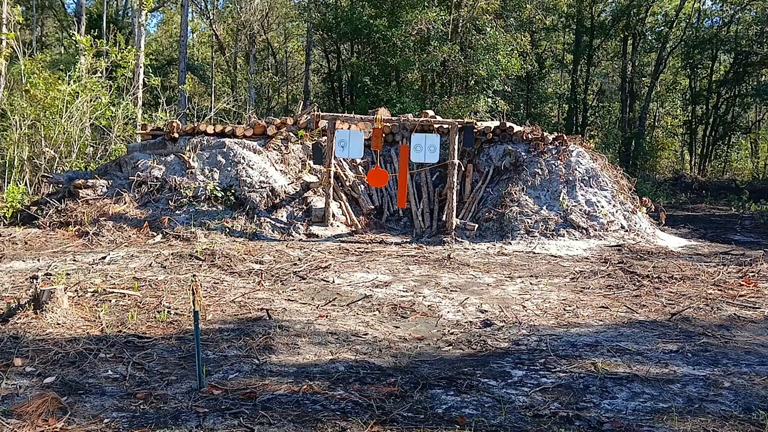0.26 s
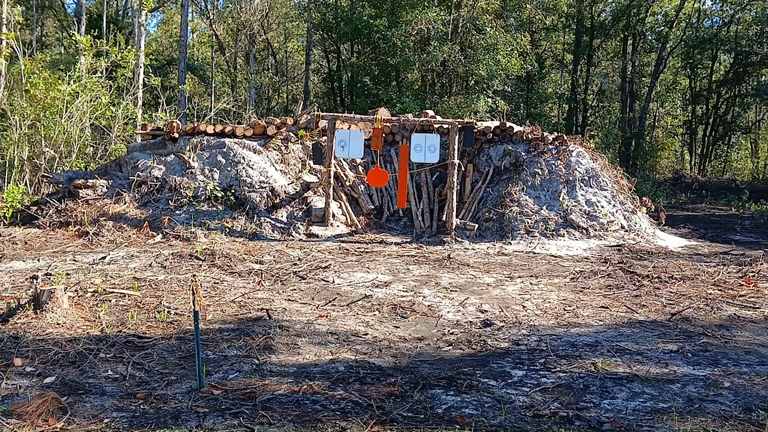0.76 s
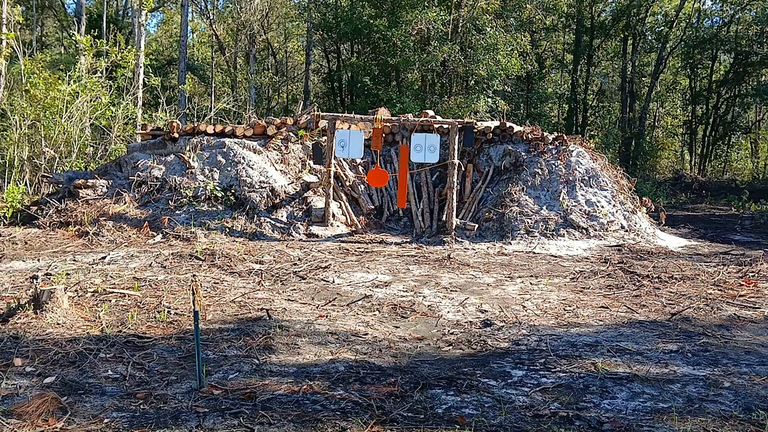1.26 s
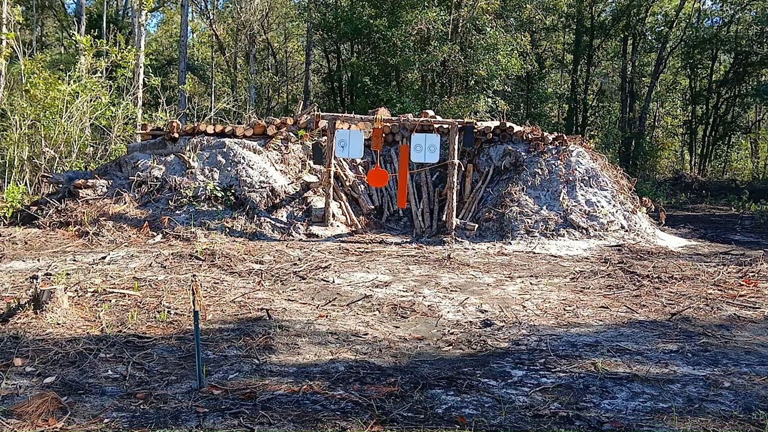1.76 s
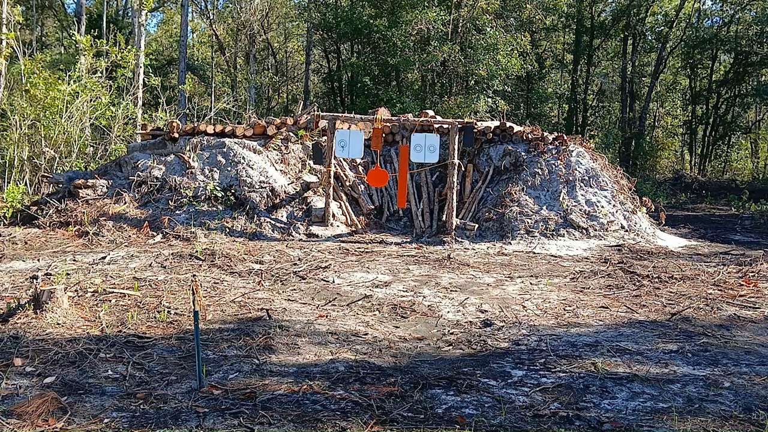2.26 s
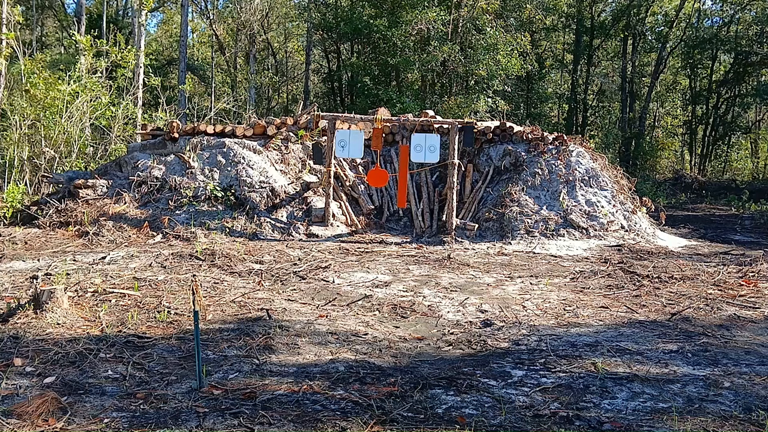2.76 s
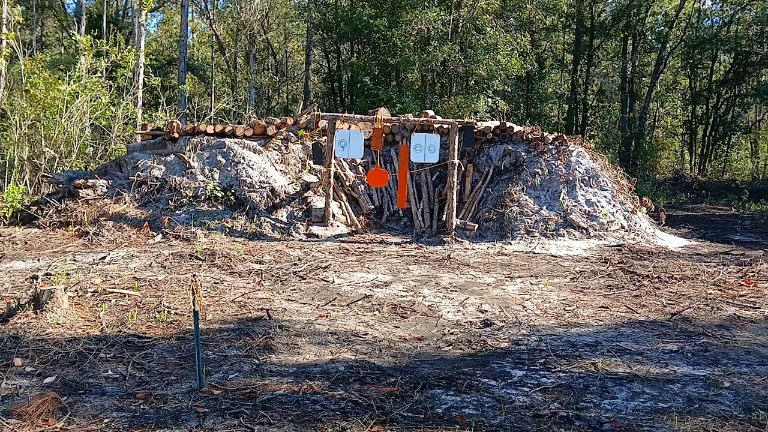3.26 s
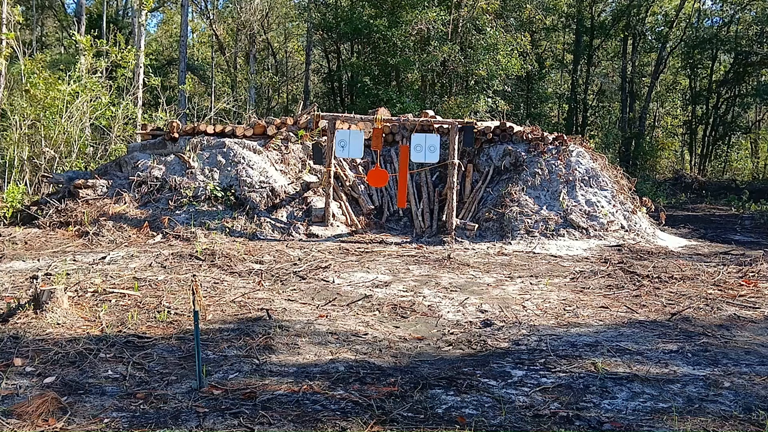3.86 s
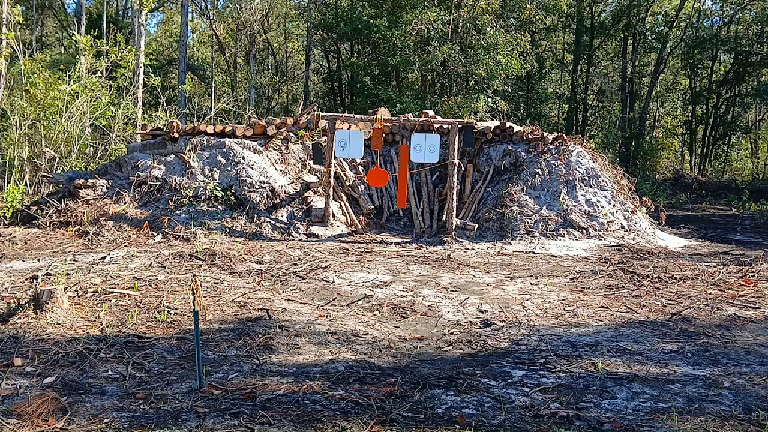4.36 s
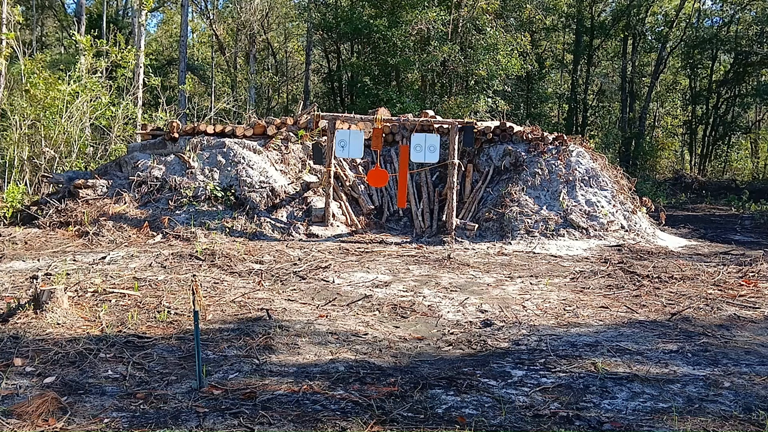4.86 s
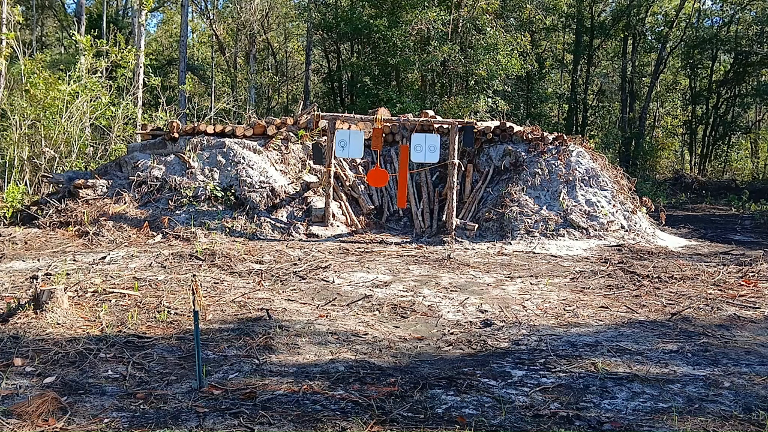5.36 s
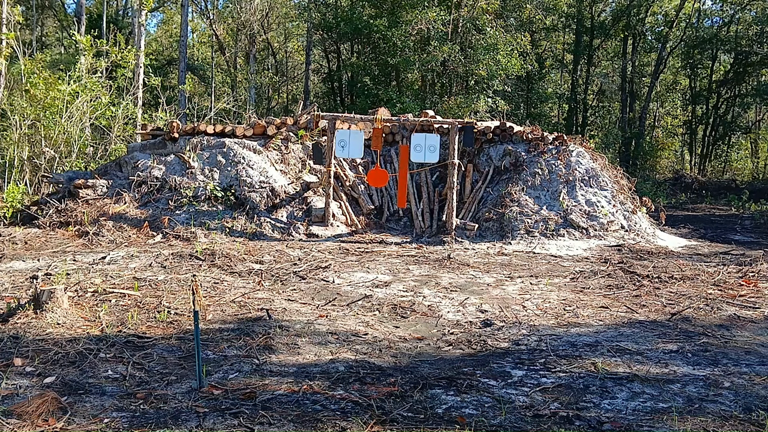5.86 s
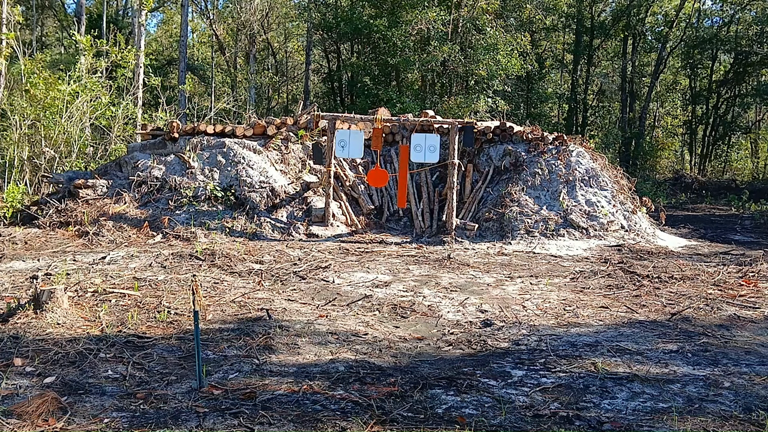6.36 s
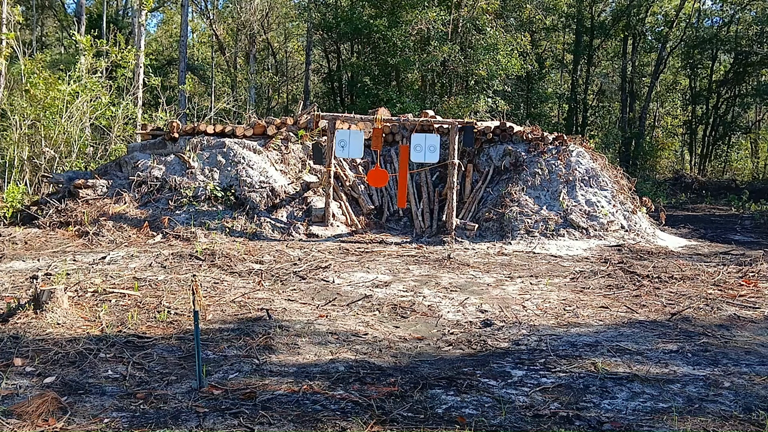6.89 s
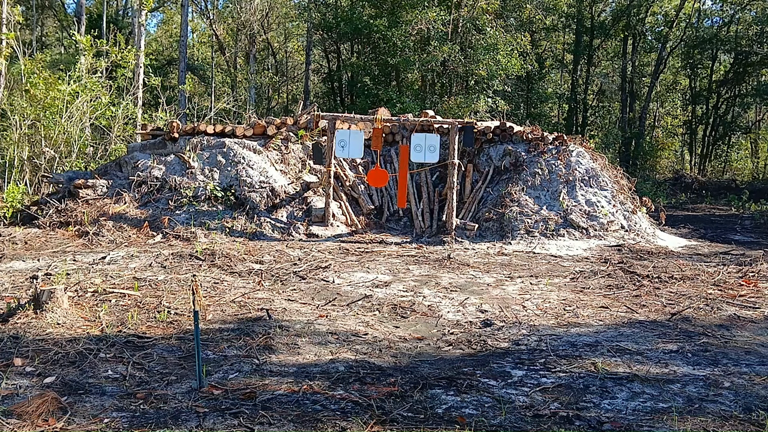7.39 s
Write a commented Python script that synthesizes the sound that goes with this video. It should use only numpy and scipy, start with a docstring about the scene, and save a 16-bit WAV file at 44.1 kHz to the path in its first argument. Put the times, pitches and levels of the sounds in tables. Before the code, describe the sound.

A calm forest clearing, heard in stereo from beside the shooter: soft hush, a low distant engine drone, a thin far cricket and intermittent very high, fast trills. Tiny bird chips at 0.3 and 0.5 s lead to a phrase at 0.6-1.5 s, a short buzz then gliding whistles, slightly right. At 1.66 s an air rifle fires: a faint hammer tick, a dry, sharp blast and a low shudder. At 1.76 s the pellet cracks hard on a hanging steel plate; bright clang fades over about a second, lower modes linger, and the trees return a faint echo near 2.0 s. The background is ducked, then creeps back. The cricket swells around 3.2 s. Light metallic clicks with rattle come at 3.35, 3.9-4.15 and 4.45-4.6 s. A thin, high steady whine grows from 3.7 s. The bird chips at 4.64 s and repeats its phrase from 5.0 s as the engine peaks around 5.5 s.

```python
"""In a forest clearing a soft hush, an engine's drone and a far cricket's tone last throughout, and a high
trill comes and goes. A songbird chips and sings its phrase, a harmonic buzz and gliding whistles. An air rifle
fires as bursts of coloured noise; a tenth of a second later the pellet cracks on a hanging steel plate, whose
decaying modes ring on while the trees scatter the clang. Later the rifle's action clicks, a thin whine of
steady tones grows, and the bird sings again as the engine passes nearest."""
import sys
import numpy as np
from scipy import signal
from scipy.fft import rfft, irfft
from scipy.io import wavfile
from scipy.ndimage import uniform_filter1d, minimum_filter1d

SR = 44100
rng = np.random.default_rng(int(sys.argv[2]) if len(sys.argv) > 2 else 0)


def file_out(sig):
    """Save sig as 16-bit WAV at sys.argv[1]."""
    # one column per channel
    cols = np.atleast_2d(sig).T
    # limit, then scale
    lim = np.clip(cols, -1, 1)
    pcm = np.round(lim * 32767).astype(np.int16)
    wavfile.write(sys.argv[1], SR, pcm)


N = 336465
TIME = np.arange(N) / SR


def amp(db):
    """The decibel: twenty of them make a tenfold gain."""
    return 10 ** (np.asarray(db) / 20)


def unit(x):
    """Normalization to a root-mean-square of 1."""
    return x / np.sqrt(np.mean(x ** 2) + 1e-20)


def read(points, hz):
    """Interpolation of a frequency table along a logarithmic axis."""
    f, value = np.transpose(points)
    return np.interp(np.log(hz + 1), np.log(f + 1), value)


def add(mix, s, sound):
    """Superposition: a stereo sound joins the mix at time s."""
    part = mix[:, max(round(s * SR), 0):][:, :sound.shape[1]]
    part += sound[:, :part.shape[1]]


def place(x, lag, right_db=0):
    """Interaural cues: the left channel is late by lag samples, the right differs by right_db."""
    return np.array([np.roll(x, round(lag)), x * amp(right_db)])


def noise(spectrum, size, same=0., tilt_db=0):
    """Filtered noise: stereo, rms 1, with a given colour, tilt per octave and left-right correlation."""
    hz = np.fft.rfftfreq(size, 1 / SR)
    a, b = rfft(rng.standard_normal((2, size)))
    c = np.clip(read(same, hz) if np.ndim(same) else same, -1, 1)
    colour = amp(read(spectrum, hz) + tilt_db * np.log2((hz + 200) / 4000))
    right = c * a + np.sqrt(1 - c ** 2) * b
    return unit(irfft(np.array([a, right]) * colour, size))


def burst(spectrum, db, t60, same=0., tilt_db=0, rise=0.0003):
    """Exponential decay: coloured noise rises quickly and loses 60 dB in t60 seconds."""
    t = TIME[:SR]
    envelope = amp(db - 60 * t / t60) * (1 - np.exp(-t / rise))
    return noise(spectrum, SR, same, tilt_db) * envelope


def wander(size, rate):
    """Band-limited random modulation of rms 1, drawn at rate knots a second."""
    knots = rng.standard_normal(int(size / SR * rate) + 8)
    smooth = signal.resample(knots, 8 * len(knots))
    return unit(np.interp(np.linspace(0, len(smooth) - 1, size), np.arange(len(smooth)), smooth))


def trees(x, wet_db, t60):
    """Multiple scattering: trunks and leaves return sparse random echoes as a decaying tail."""
    t = TIME[:SR]
    echoes = rng.standard_normal((2, SR)) * (rng.random((2, SR)) < .08)
    tail = echoes * amp(-60 * t / t60) * (1 - np.exp(-t / 0.0034))
    return x + amp(wet_db) * signal.fftconvolve(x, tail / np.linalg.norm(tail[0]), axes=1)[:, :N]


# The shot: hammer, then the blast of air. Each row: start in seconds, level in dB, decay t60 in seconds.
SHOT_BURSTS = [(1.6554, -27, .05), (1.6622, -6, .014), (1.6654, -3.5, .006), (1.666, -18, .05)]
# Colours of the blast, the clearing's answer and the puff of air.
# Each row: frequency in Hz, relative spectral density in dB.
BLAST_COLOUR = [(30, -8), (200, -6.5), (500, -3.5), (1000, 1.5), (3200, 0.5), (5800, -9), (7500, -2.5),
                (10500, 2), (13500, -3), (16000, -6)]
CLEARING_COLOUR = [(30, -1.5), (150, -4.5), (700, -6), (2000, -1), (6000, -9), (9500, 1), (12500, 1),
                   (16000, -3.5)]
PUFF_COLOUR = [(15, -10), (40, -1.5), (130, -5), (400, -5.5), (900, -21.5), (3000, -50.5)]


def rifle():
    """Impulsive radiation: the hammer trips the valve, air leaves the muzzle, the clearing hisses back."""
    out = np.zeros((2, N))
    for s, db, t60 in SHOT_BURSTS:
        add(out, s, burst(BLAST_COLOUR, db, t60, same=-0.2))
    blast_s = SHOT_BURSTS[1][0]
    add(out, blast_s, burst(PUFF_COLOUR, db=-38, t60=0.17, same=-0.28, rise=0.0018))
    add(out, blast_s, shudder())
    add(out, blast_s, burst(CLEARING_COLOUR, db=-24, t60=0.58, same=-0.6, rise=.006))
    return out


SHUDDER_HZ, SHUDDER_DB, SHUDDER_HOLD_S, SHUDDER_T60 = 79, -23, .02, .14  # full swing for the hold, then decay
SHUDDER_SNAP_HZ, SHUDDER_SNAP_S = 175, .002  # initial excess of pitch and its time constant


def shudder():
    """Damped oscillation: the shot jolts the camera, driving its two microphones in antiphase."""
    t = TIME[:SR]
    hz = SHUDDER_HZ + SHUDDER_SNAP_HZ * np.exp(-t / SHUDDER_SNAP_S)
    envelope = amp(SHUDDER_DB - 60 * np.maximum(t - SHUDDER_HOLD_S, 0) / SHUDDER_T60)
    swing = envelope * np.sin(2 * np.pi * np.cumsum(hz) / SR)
    return np.array([swing, -swing])


HIT_S, BOUNCE_S = 1.7552, 0.00089  # the pellet lands; its crack comes again off the ground, this much later
# Lead bursting on steel. Each row: frequency in Hz, relative spectral density in dB.
SPLASH_COLOUR = [(100, -23), (500, -12), (1800, -2), (4000, -1.5), (6800, -5), (8500, -0.5), (12000, -0.5),
                 (16000, -0.5)]


def impact():
    """Impact and image source: a small tick, the pellet's crack, its ground reflection and a splash of lead."""
    out = np.zeros((2, N))
    u = (TIME[:40] - .0002) / .00005
    crack = -(1 - u ** 2) * np.exp(-u ** 2 / 2)  # a negative spike between two shallow rebounds
    add(out, HIT_S - .0021, burst(SPLASH_COLOUR, db=-20, t60=.01, same=.4))
    add(out, HIT_S, amp(5) * place(crack, lag=0))
    add(out, HIT_S + BOUNCE_S, amp(0.5) * place(crack, lag=0))
    add(out, HIT_S, burst(SPLASH_COLOUR, db=-4, t60=.085, same=.25) * amp([[-1.5], [1.5]]))
    return out


# Modes of the steel plate. Each row: frequency in Hz, relative level in dB, decay t60 in seconds.
PLATE_MODES = [(103, -50, 5.0), (149, -49, 6), (169, -45.5, 1.6), (184, -51.5, 3.2), (271, -59, 4.5),
               (389, -48, 2.5), (417, -48, 1.5), (477, -58.5, 3.4), (573, -48.5, 2.57), (664, -46, 1.6),
               (702, -38, 1.53), (730.7, -40, 1.97), (762, -50, 2.2), (827, -45.5, 1.2), (860, -45, 1.8),
               (863, -38.5, 0.72), (1032, -45.5, 1.6), (1002, -40.5, 1.4), (1446, -34, 0.64),
               (1560, -30, 0.42), (1532, -32.5, 0.57), (1627, -33, 0.85), (1690, -35.5, 0.61),
               (1696, -30, 0.43), (1950, -38, 0.69), (2170, -32.5, 0.66), (2470, -33.5, 0.48),
               (2720, -38.5, 0.33), (3030, -36, 0.28), (3380, -35.5, 0.23)]
# Colour of the dense high modes. Each row: frequency in Hz, relative spectral density in dB.
CLANG_COLOUR = [(60, -29.5), (200, -16.5), (500, -14), (850, 0.5), (1250, -5), (1650, 1.5), (2400, -2),
                (4000, -2.5), (7000, -10), (9000, -4.5), (12000, -5.5), (16000, -5)]
# Damping of the dense modes. Each row: frequency in Hz, decay t60 in seconds.
CLANG_DECAY = [(150, 1.8), (450, 2), (800, 1.1), (1600, .84), (3500, 0.592), (8000, 0.6815), (16000, 0.35)]


def plate():
    """Modal vibration: clear modes of the steel, over a crowd of others blurred by the trees."""
    out, t = np.zeros((2, N)), TIME[:4 * SR]
    ring = np.zeros(len(t))
    for hz, db, t60 in PLATE_MODES:
        ring += amp(db - 60 * t / t60) * np.sin(2 * np.pi * (hz * t + rng.random()))
    add(out, HIT_S, amp(7) * place(ring * (1 - np.exp(-t / .012)), lag=0))

    # each band of the noise decays at its own rate
    crowd = noise(CLANG_COLOUR, 2 * SR, same=[(500, 0.75), (2000, .6), (6000, .3), (14000, 0.12)])
    band_hz, at, z = signal.stft(crowd, SR, nperseg=512)
    damping = amp(-60 * at / read(CLANG_DECAY, band_hz)[:, None])
    clang = signal.istft(z * damping, SR, nperseg=512)[1][:, :2 * SR]
    clang *= 1 - np.exp(-t[:2 * SR] / 0.0038)
    add(out, HIT_S, amp(-10.5) * clang)
    add(out, HIT_S, burst(SPLASH_COLOUR, db=-38.5, t60=1.6, tilt_db=-5, rise=.1))  # far trees hiss back
    add(out, HIT_S + .258, amp(-42.5) * clang[::-1])  # echo from the edge of the wood, sides exchanged
    return out


# Clicks of the action. Each row: start in seconds, level in dB, decay t60 in seconds, tilt in dB per octave,
# ring of the part in Hz, rebound delay in seconds, rebound level in dB relative to the click.
ACTION_CLICKS = [(3.3532, -37, 0.03, -4.5, 3900, 0.019, -11.5), (3.918, -40.5, 0.038, -1, 3400, .008, -26),
                 (4.018, -46.5, 0.039, -2.5, 8000, 0.011, -4),
                 (4.0664, -26.5, 0.028, 4.5, 5200, 0.0019, 0.5),
                 (4.1445, -37, 0.027, -3, 4120, 0.012, -5.5), (4.456, -48.5, .05, -3.5, 8500, 0.0085, -3),
                 (4.4662, -36, 0.032, 2.5, 3230, .003, -7), (4.486, -55, 0.039, -10, 550, .004, -5),
                 (4.541, -38, 0.022, -3, 7200, .011, 2.5), (4.594, -25.5, .02, 0.5, 2050, 0.0082, -23)]
# Colours of the steel parts and of the stock's answer.
# Each row: frequency in Hz, relative spectral density in dB.
PARTS_COLOUR = [(100, -18), (400, -11), (800, -9), (2000, 1), (2600, -2), (3600, 2.5), (4300, -0.5),
                (5200, -0.5), (6500, -5), (8200, 1.5), (11500, -2), (13000, -5), (16000, -16)]
STOCK_COLOUR = [(100, -13), (300, -9), (450, -1.5), (650, -7.5), (900, -16), (1250, -12.5), (2000, -11),
                (4000, -16)]
RING_DB, RING_OCTAVES = 5.5, 0.19  # height and width of each part's resonance
RATTLE_DB, RATTLE_T60, RATTLE_PER_S = -18.5, 0.086, 310  # level relative to the click, s, chance taps a second


def action():
    """Resonance excited by impact: steel parts latch, rebound and rattle, and the stock knocks dully."""
    out, bands = np.zeros((2, N)), np.geomspace(100, 16000, 120)
    for s, db, t60, tilt_db, ring_hz, rebound_s, rebound_db in ACTION_CLICKS:
        resonance_db = RING_DB * np.exp(-(np.log2(bands / ring_hz) / RING_OCTAVES) ** 2)
        part = np.transpose([bands, read(PARTS_COLOUR, bands) + resonance_db])
        for at, level_db in [(s, db), (s + rebound_s, db + rebound_db)]:
            left, right = burst(part, level_db, t60, same=0.61, tilt_db=tilt_db)
            add(out, at, np.array([left, np.roll(right, 11)]))  # the right side lags by 11 samples
            add(out, at, burst(STOCK_COLOUR, db=-40 + 0.37 * level_db, t60=0.15, same=0.54, rise=0.0023))
        taps = rng.random(SR) < RATTLE_PER_S / SR
        chatter = unit(signal.lfilter([1], [1, -np.exp(-1 / (0.0016 * SR))], taps))
        loose = burst(part, db + RATTLE_DB, RATTLE_T60, same=0.246, tilt_db=-3.5, rise=0.002)
        add(out, s, chatter * loose)
    return trees(out, wet_db=-13, t60=0.54)


NOTE_ATTACK_S, NOTE_RELEASE_S = 0.012, 0.0047
NOTE_EASE = 1.05  # above 1, the glide slows towards its end


def note(length, from_hz, to_hz, db, depth_hz, trill_hz=58):
    """Joint frequency and amplitude modulation of a gliding whistle: a deep trill breaks it into beads."""
    t = np.arange(0, max(length, .01), 1 / SR)
    glide = to_hz + (from_hz - to_hz) * (1 - t / t[-1]) ** NOTE_EASE
    shake = 2 * np.pi * trill_hz * t + 0.39 * wander(len(t), 60)
    pitch = glide - depth_hz * np.cos(shake) + (15 + .22 * depth_hz) * wander(len(t), 600)
    throb = 1 - np.clip(depth_hz / 220, 0, .95) * (1 + np.cos(shake - .5)) / 2
    ramp = np.minimum(np.minimum(t / NOTE_ATTACK_S, t[::-1] / NOTE_RELEASE_S), 1)
    gate = np.sin(np.pi / 2 * ramp) ** 2
    level = np.sqrt(2) * amp(db + 1.5 * wander(len(t), 200))
    return level * throb * gate * np.sin(2 * np.pi * np.cumsum(pitch) / SR)


# Colour of the buzz. Each row: frequency in Hz, gain in dB.
BEAK_COLOUR = [(2000, -24), (2750, -8), (3150, -5), (3700, 1), (4450, -1.5), (5100, -13), (5800, -10.5),
               (6800, -25)]
BUZZ_S, BUZZ_HZ, BUZZ_ARCH = .19, 388, .19  # length, lowest fundamental, share by which the pitch arches up
BUZZ_DB, BUZZ_HALO_DB = -54.5, -5  # level before the singing's own, hiss relative to the harmonics


def rasp(flutter_hz=205):
    """Harmonic series under a fixed resonance: an arch of pitch in a halo of hiss; upper partials flutter."""
    t = np.arange(0, BUZZ_S, 1 / SR)
    hz = BUZZ_HZ * (1 + BUZZ_ARCH * (1 - abs(2 * t / BUZZ_S - 1) ** 2.5))
    turns = np.cumsum(hz * (1 + 0.0098 * wander(len(t), 600))) / SR
    flutter = 1 + 0.19 * np.sin(2 * np.pi * flutter_hz * t)
    voice = np.zeros(len(t))
    for k in range(5, 15):
        partial = amp(read(BEAK_COLOUR, k * hz)) * np.sin(2 * np.pi * (k * turns + rng.random()))
        voice += partial * (flutter if k > 8 else 1)
    halo = amp(BUZZ_HALO_DB) * noise(BEAK_COLOUR, len(t), tilt_db=-2)[0]
    envelope = amp(BUZZ_DB + 2 * wander(len(t), 90)) * np.sin(np.pi * t / BUZZ_S) ** 0.24
    return envelope * unit(unit(voice) + halo)


# Whistles of the phrase. Each row: start after the phrase's in seconds, length in seconds, first pitch in Hz,
# last pitch in Hz, level in dB before the singing's own, trill depth in Hz.
PHRASE_WHISTLES = [(.234, .088, 3689, 2650, -42, 208), (0.315, 0.046, 2564, 2500, -49.5, 13),
                   (0.389, 0.044, 2722, 3185, -44, 84), (0.441, 0.03, 3070, 2775, -46.5, 36),
                   (0.501, .036, 2341, 2032, -60, 113), (0.551, .088, 1934, 2206, -62, 40),
                   (.676, .024, 2230, 2530, -50.5, 76), (0.708, .02, 2435, 2530, -60, 102.5),
                   (0.814, .019, 4100, 6200, -49.5, -1)]
# Singings of the phrase. Each row: start in seconds, level change in dB.
PHRASE_STARTS = [(.625, -1.5), (4.985, -1.5)]
# Single chips outside the phrases. Each row: start in seconds, length in seconds, first pitch in Hz,
# last pitch in Hz, level in dB, trill depth in Hz.
SINGLE_CHIPS = [(.287, 0.027, 6750, 7270, -61, 100), (0.31, .016, 6570, 4200, -52, 100),
                (0.541, .027, 3830, 6300, -55.5, 900), (4.643, 0.029, 7400, 7300, -54.5, 30)]


def songbird():
    """Lateralization by delay and level: a few chips and one phrase sung twice, from the trees on the right."""
    out = np.zeros((2, N))
    for start, db in PHRASE_STARTS:
        add(out, start, amp(db) * place(rasp(), lag=18, right_db=1.5))
        for after, *shape in PHRASE_WHISTLES:
            add(out, start + after, amp(db) * place(note(*shape), lag=18, right_db=1.5))
    for s, *shape in SINGLE_CHIPS:
        add(out, s, place(note(*shape), lag=14, right_db=3.5))
    return trees(out, wet_db=-12, t60=.45)


# Bouts of the high trill. Each row: start in seconds, end in seconds, centre pitch in Hz, relative level in dB.
TRILL_BOUTS = [(0, 0.269, 7320, -69.5), (0.123, .28, 8200, -74), (0.542, .73, 7970, -71.5),
               (0.742, 1.036, 7250, -69.5), (1.02, 1.203, 8100, -72), (1.477, 1.653, 7210, -68),
               (2.296, 2.56, 7200, -67.5), (2.994, 3.342, 7120, -70), (3.88, 4.054, 7340, -72),
               (4.679, 4.995, 7160, -68), (5.494, 5.824, 7200, -69.5)]


def trill(per_s=50, sweep_hz=750):
    """Periodic frequency sweep: far, very high runs of tiny downward chirps."""
    out = np.zeros((2, N))
    for start, end, hz, db in TRILL_BOUTS:
        t = np.arange(0, max(end - start, .02), 1 / SR)
        cycle = (t * per_s + 0.19 * wander(len(t), 30)) % 1
        turns = np.cumsum(hz + sweep_hz * (1 - 2 * cycle)) / SR
        chirps = unit(np.sin(np.pi * cycle) ** 2 * np.sin(2 * np.pi * turns))
        envelope = amp(db - 7.5 + 2 * wander(len(t), 60)) * signal.windows.tukey(len(t), .3)
        add(out, start, place(envelope * chirps, lag=0))
    return trees(out, wet_db=0.5, t60=.3)


CRICKET_HZ, CRICKET_DB = 3442, -80  # pitch, mean peak level outside the lift
CRICKET_PEAK_S, CRICKET_LIFT_S, CRICKET_LIFT_DB = 3.2, .9, 5  # time, width and height of its one lift, while the gain is ducked and creeping back


def cricket():
    """Near-pure tone with random modulation: one far cricket wavers thinly; its level is lifted once while the
    gain is ducked after the clang."""
    db = CRICKET_DB + CRICKET_LIFT_DB * np.exp(-((TIME - CRICKET_PEAK_S) / CRICKET_LIFT_S) ** 2)
    tone = np.sin(2 * np.pi * np.cumsum(CRICKET_HZ + 20 * wander(N, 200)) / SR)
    return place(amp(db + 2 * wander(N, 40)) * tone, lag=0)


# Colour of the engine's rumble. Each row: frequency in Hz, relative spectral density in dB.
RUMBLE_COLOUR = [(20, -37.5), (45, -22.5), (62, -2), (78, 0), (100, -2), (120, -14), (170, -17), (210, -26),
                 (300, -24), (420, -47.5), (1000, -70.5)]
ENGINE_HZ, ENGINE_DB, RUMBLE_DB = 82.6, -46, -51  # firing rate, its rms level when nearest, rumble's level
NEAREST_S, PASSING_S = 5.46, 1.4  # when the engine is nearest, and how long the firing takes to fall 3 dB
ENGINE_LAG = 9  # samples by which its tones reach the left microphone later


def engine():
    """Inverse-distance law: a far engine's firing tone passes, over steady rumble and a faint higher line."""
    distance = np.hypot(1, (TIME - NEAREST_S) / PASSING_S)  # in units of the nearest distance
    firing_level = amp(ENGINE_DB + 0.95 * wander(N, 7.4)) / distance
    firing = firing_level * np.sin(2 * np.pi * np.cumsum(ENGINE_HZ + .6 * wander(N, 6)) / SR)
    line_level = amp(-74 + 2 * wander(N, 5.1))
    line = line_level * np.sin(2 * np.pi * np.cumsum(279 + wander(N, 4.7)) / SR)
    rumble = amp(RUMBLE_DB) * noise(RUMBLE_COLOUR, N, same=[(30, 0.94), (80, .98), (300, 0.7)])
    return np.sqrt(2) * place(firing + line, lag=ENGINE_LAG) + rumble


# Steady tones of the whine. Each row: frequency in Hz, relative level in dB.
WHINE_TONES = [(3618, -81), (4247, -78), (4544, -80), (4651, -80), (4910, -81), (5168, -80), (5426, -83),
               (5685, -82), (5798, -83), (5943, -82), (6202, -75), (6460, -82), (6718, -73), (6831, -82),
               (7752, -69), (8010, -82), (8161, -80), (8419, -81)]
# Hiss round the whine. Each row: frequency in Hz, relative spectral density in dB.
SIZZLE_COLOUR = [(1500, -40), (3200, -12), (4600, -0.5), (8200, 0), (9200, -3.5), (16000, -13)]
WHINE_START_S, WHINE_RISE_S, WHINE_POWER = 3.67, 2.88, 1.9  # start, time to unit gain, exponent of growth
WHINE_WAVER_DB = 1.5  # rms waver of each tone by itself


def whine():
    """Additive synthesis: steady tones and their hiss grow as a power of the time since their start."""
    tones = np.zeros((2, N))
    for side in tones:
        for hz, db in WHINE_TONES:
            level = amp(db + WHINE_WAVER_DB * wander(N, 2))
            side += level * np.sin(2 * np.pi * (hz * TIME + rng.random()))
    growth = (np.maximum(TIME - WHINE_START_S, 0) / WHINE_RISE_S) ** WHINE_POWER
    return (amp(4.5) * tones + amp(-66.0) * noise(SIZZLE_COLOUR, N)) * growth


# Colour of the forest hush. Each row: frequency in Hz, relative spectral density in dB.
HUSH_COLOUR = [(20, 4.5), (120, 5), (200, 3.5), (300, 6), (420, -4), (700, -2.5), (1200, -0.5), (2500, -4),
               (3600, -1), (5000, -9.5), (9000, -11.5), (16000, -9)]
# Likeness of left and right in the hush. Each row: frequency in Hz, correlation from 0 to 1.
HUSH_CORRELATION = [(30, .6), (80, 0.28), (300, 0.35), (1000, 0.0031), (3000, 0), (16000, 0)]


def forest():
    """Diffuse field: a soft hush, alike on both sides only at low frequencies, wavers slightly."""
    return noise(HUSH_COLOUR, N, HUSH_CORRELATION) * amp(-61.5 + .5 * wander(N, 4))


def scene():
    """Linear superposition of everything that reaches the camera."""
    events = rifle() + impact() + plate() + action()
    creatures = songbird() + trill() + cricket()
    return events + creatures + engine() + whine() + forest()


def record(dry, threshold_db=-22, share=.43, hold_s=1.27, recover_db_per_s=13):
    """Dynamic compression: loud sound ducks the gain, which holds and creeps back; peaks round, band ends."""
    power_db = 10 * np.log10(abs(uniform_filter1d((dry ** 2).mean(0), size=400)) + 1e-12)
    over_db = share * np.maximum(power_db - threshold_db, 0)
    half = round(hold_s * SR / 2)
    # the deepest duck of the last hold_s seconds is held
    held_db = -minimum_filter1d(-over_db, size=2 * half + 1, origin=half, mode="nearest")
    fall = recover_db_per_s * TIME
    duck_db = np.maximum.accumulate(held_db + fall) - fall
    rounded = np.tanh(dry * amp(-uniform_filter1d(duck_db, size=100)))
    low_pass = signal.firwin(255, 16100, window=("kaiser", 8), fs=SR)  # edge in Hz
    return signal.oaconvolve(rounded, low_pass[None], "same")


dry = scene()
out = record(dry)
file_out(out)
```